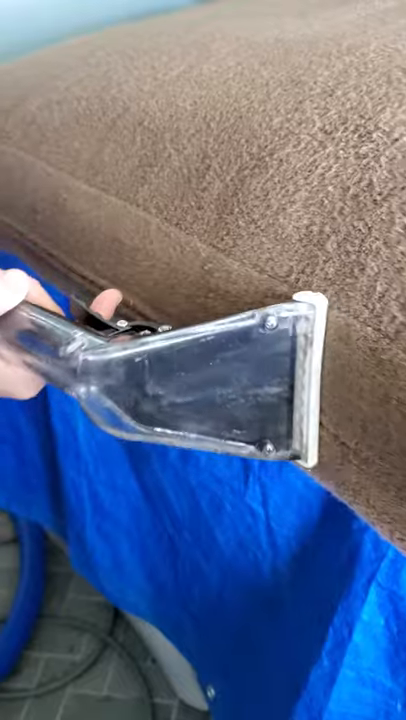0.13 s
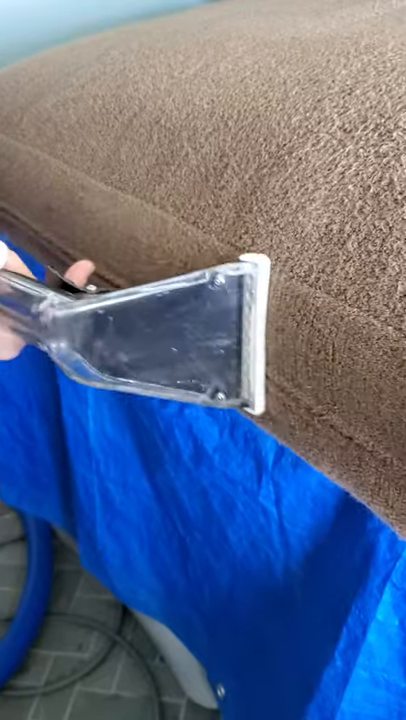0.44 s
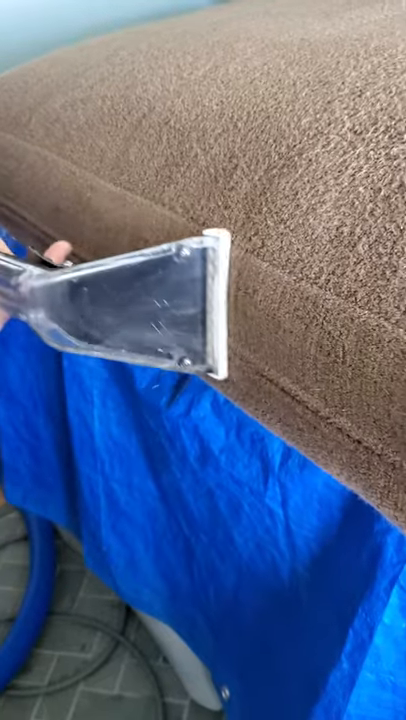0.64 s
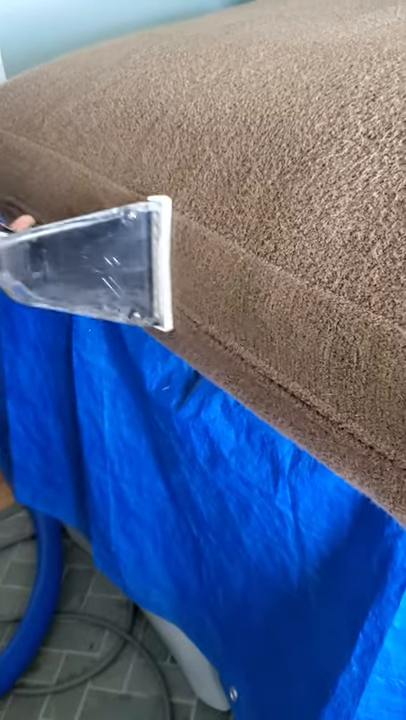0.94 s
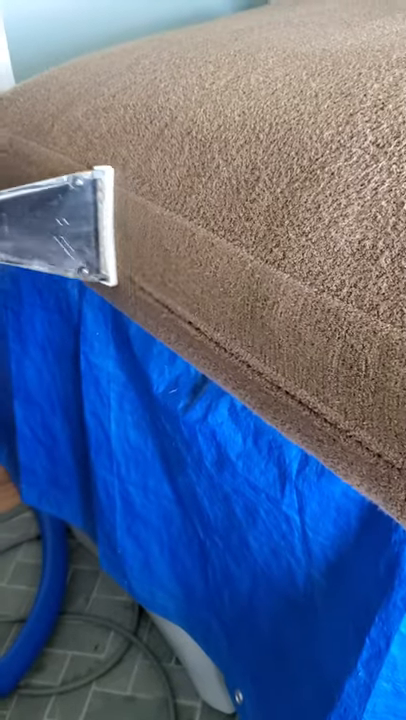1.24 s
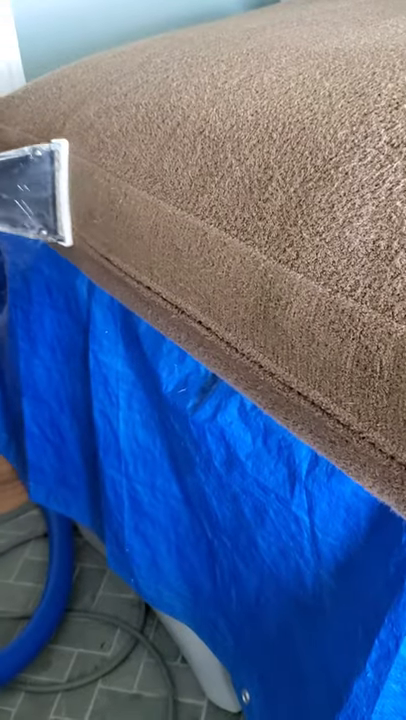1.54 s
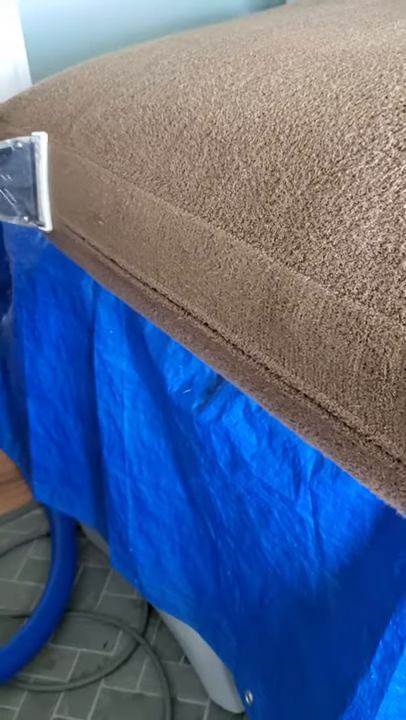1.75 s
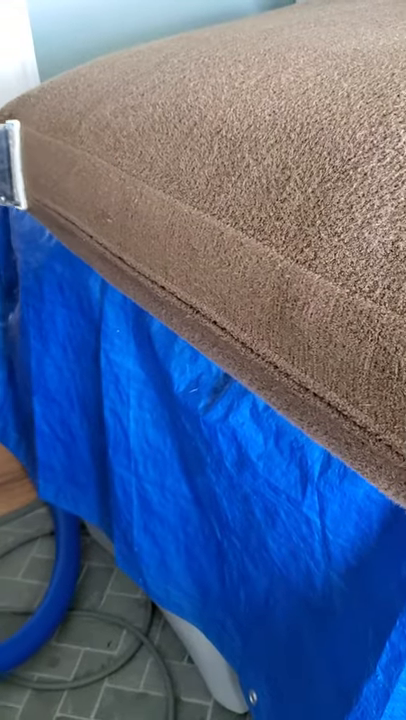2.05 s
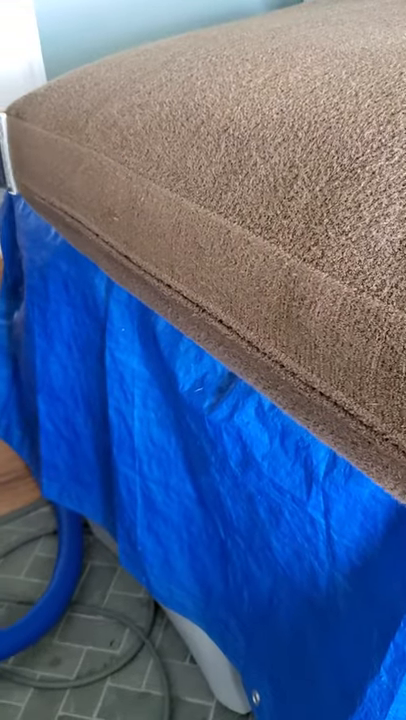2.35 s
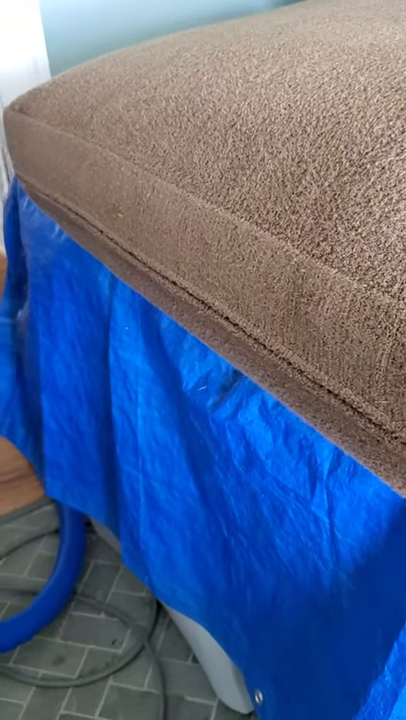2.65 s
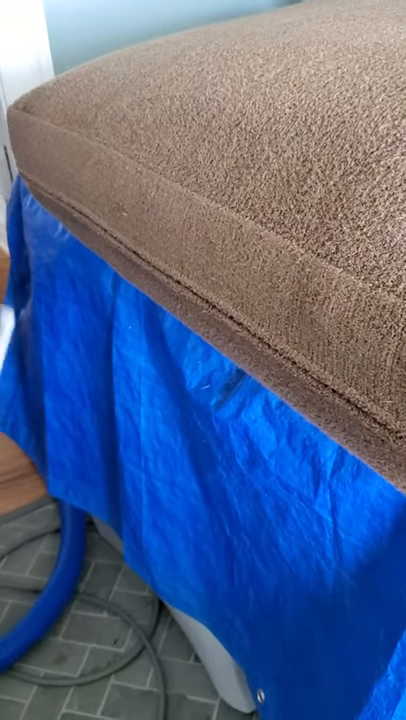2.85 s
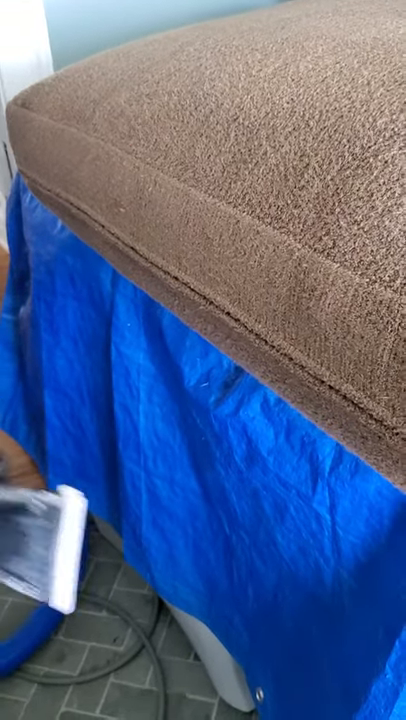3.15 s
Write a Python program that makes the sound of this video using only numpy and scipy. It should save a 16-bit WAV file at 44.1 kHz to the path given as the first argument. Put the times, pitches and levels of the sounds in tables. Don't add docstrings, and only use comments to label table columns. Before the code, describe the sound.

A loud upholstery extractor roars steadily indoors, its whine climbing while the nozzle is sealed on a cushion; then a falling whistle and tearing release give way to duller-pitched, hissing open air, close stereo microphone.

```python
import sys
import numpy as np
from scipy import signal
from scipy.fft import rfft, irfft, next_fast_len
from scipy.io import wavfile
from scipy.ndimage import uniform_filter1d, map_coordinates

SR = 44100
rng = np.random.default_rng(int(sys.argv[2]) if len(sys.argv) > 2 else 0)


def voltage_ratio(level):
    return 10 ** (np.asarray(level, float) / 20)


def pcm_store(signal):
    levels = np.round(np.clip(np.atleast_2d(signal), -1, 1) * 32767)
    wavfile.write(sys.argv[1], SR, levels.astype(np.int16).T)


N = 145971
TIME_S = np.arange(N) / SR
FASTER = 1.0087


def unit(x):
    return x / np.sqrt(np.mean(abs(x) ** 2) + 1e-20)


def along(points, hz):
    point_hz, value = np.transpose(points)
    return np.interp(np.log(hz + 1), np.log(point_hz + 1), value)


def curves(rows):
    row_s, *columns = np.transpose(rows)
    return [np.interp(TIME_S, row_s, column) for column in columns]


def ears(left_minus_right):
    return np.outer([0.5, -0.5], left_minus_right)


def wobble(knots_per_s):
    return map_coordinates(rng.standard_normal(600), [TIME_S * knots_per_s], mode="wrap")


def flutter(knots_per_s, depth):
    return 1 + depth * np.array([wobble(knots_per_s) + 1j * wobble(knots_per_s) for ear in "LR"])


def bump(f, hz, width_hz):
    return 1 / (1 + (2 * (f - hz) / width_hz) ** 2)


def bell(centre_s, length_s):
    return np.exp(-((TIME_S - centre_s) / length_s) ** 2)


def filtered(x, response):
    m = next_fast_len(N + 8192)
    return irfft(rfft(x, m) * response(np.fft.rfftfreq(m, 1 / SR)), m)[..., :N]


def opened():
    return np.clip((TIME_S - 2.5) * 10, 0, 1)


def rush(spectrum, peaks, lean, patchy_db):
    # frequency in Hz, left-right likeness (0..1)
    alike = [(60, 0.98), (260, 0.98), (350, 0.97), (500, 0.19), (860, 0.37), (1500, 0.33), (2000, 0.13),
             (2600, 0.037)]
    # frequency in Hz, left phase lead in rad
    lead = [(400, 0), (600, 1.4), (880, 0), (1050, .7), (1290, 3), (1650, 2), (2000, 3.1)]
    z = signal.stft(rng.standard_normal((2, N)), nperseg=512)[2]
    patches = uniform_filter1d(rng.standard_normal(z.shape[1:]), size=6, axis=0)
    patches = uniform_filter1d(patches, size=12, axis=1)
    pair = signal.istft(z * voltage_ratio(patchy_db * unit(patches)), nperseg=512)[1][:, :N]

    def likeness(f):
        angle = np.arccos(np.clip(along(alike, f), -1, 1)) / 2
        return np.array([np.cos(angle), np.sin(angle)])

    def colour(f):
        ring_db = sum(np.outer(db, bump(f, hz, width_hz)) for hz, width_hz, *db in peaks)
        level_db = along(spectrum, f) + ears(along(lean, f)) + ring_db
        return voltage_ratio(level_db) * np.exp(1j * ears(along(lead, f)))

    mid, side = filtered(pair, likeness)
    return unit(filtered(np.array([mid + side, mid - side]), colour))


def tone(turn, left_db, right_db, lead, shake):
    phase = turn + ears(lead + 0 * turn)
    level_db = np.array([left_db + 0 * turn, right_db + 0 * turn]) + 1.3 * wobble(22)
    return voltage_ratio(level_db) * np.sqrt(2) * np.imag(flutter(14, shake) * np.exp(1j * phase))


def fan_roar():
    # frequency in Hz, density in dB per Hz
    spectrum = [(25, -13), (70, -12.5), (330, -5), (1100, -3), (2000, -2.5), (3500, -7), (5600, -6),
                (6100, -12.5)]
    # frequency in Hz, width in Hz, left and
    # right in dB over the roar
    modes = [(60, 5, -6, 3), (117.7, 12.5, 11, 12), (180.5, 22.4, 12, 12.5), (249, 9.5, 9.5, 12),
             (319, 8.2, 0, 11), (366, 32, 4.5, 11), (463.6, 9.6, 14.5, -2), (508, 33, -9, 11),
             (642.4, 11.4, 13, 1.5), (701, 70, 6, 3), (761, 20, 9, 8), (865, 19, -1, 10.5),
             (1006, 28, -1.5, 8.5),
             (1107, 190, -4, -6), (1263, 43, -2, 8.5), (1456, 66, 9, 3.5), (1565, 23, 4.5, 10.5),
               (1660, 53, 3.5, 1.5), (1944, 14, -8, 6), (2340, 1000, 2.5, 1), (3920, 125, -4, 7.5),
               (4820, 390, 3.5, 0), (5500, 340, -7.5, 0.5),
             (295, 30, 9, 13), (1987, 14, 3, 9), (2049, 16, 4, 12)]
    # frequency in Hz, left over right in dB
    lean = [(100, -0.5), (300, 0.5), (740, -1), (2000, -5.5), (5500, -0.5), (15000, 1.5)]
    roar_db, rumble_hz, rumble_drop_db = -22, 150, -3
    gain = voltage_ratio(roar_db + 0.2 * wobble(2.625) + 0.64 * wobble(15))
    roar = gain * rush(spectrum, modes, lean, patchy_db=0.33)
    rumble = filtered(roar, lambda f: f < rumble_hz)
    return roar + (voltage_ratio(rumble_drop_db * opened()) - 1) * rumble


def fan_tones():
    # time in seconds, shaft speed in Hz
    shaft = [(.1, 481), (.44, 492.8), (.74, 500.5), (1.04, 506), (1.44, 509.8), (1.74, 511.5), (2.4, 512.5),
             (2.6, 508.5), (2.84, 496), (3.04, 488), (3.31, 477.5)]
    blades = [
        2,
        9,
        11,
        11 * FASTER,
    ]
    unsteady = [.14, .1, .2, .2]
    # time in seconds, left in dB, right in dB, left phase lead in rad
    hum_rows = [(0.15, -30.5, -32, 0), (0.24, -39, -33.5, 2), (0.36, -31.5, -32, 0),
                (0.55, -35, -27.5, -0.8), (0.72, -41, -32, -4), (0.86, -37, -41, -4.5),
                (1.03, -29, -31, -4.5), (1.25, -35, -34.5, -6.5), (1.42, -40, -35.5, -6.5),
                (1.65, -41, -59, -7), (2.1, -40, -41, -2.5), (2.45, -42, -47, -3), (2.65, -41, -33, -2),
                (2.82, -40, -36, -2), (2.89, -38, -27, -1.5), (3.05, -41, -30, 0.5), (3.25, -28, -34, 0)]
    first_rows = [(.15, -47, -47, 2.2), (.5, -46, -48, 2.2), (.65, -39, -37, -.8), (.78, -44, -44, -.5),
                  (.85, -35, -35, -.7), (.93, -31, -41, 1.4), (1.05, -35, -33, 3.1), (1.15, -38, -36, 6),
                  (1.33, -29, -38, 8.4), (1.42, -32, -35, 9.4), (1.51, -33, -31, 10.4),
                  (1.62, -35, -32, 10.8), (1.75, -30, -34, 11.4), (1.9, -38, -31, 14.2),
                  (2.05, -31, -32, 11.6), (2.16, -25, -38, 9.9), (2.3, -29, -30, 9.4),
                  (2.47, -32, -32, 9.4)]
    second_rows = [(.15, -42, -36, -1.2), (.25, -37, -41, 1), (.4, -43, -42, -1), (.55, -39, -40, -2),
                   (.65, -35, -39, -2), (.75, -42, -34, -3.6), (.95, -40, -38, -6.1),
                   (1.15, -50, -34, -4.5), (1.35, -38, -40, -1), (1.6, -37, -38, .2), (1.9, -50, -50, .2),
                   (2.35, -39, -43, .9)]
    twin_rows = [(.15, -41, -48, -.8), (.25, -41, -41, 1.9), (.35, -48, -50, 1), (.55, -52, -40, 1.2),
                 (.8, -45, -52, .6), (.95, -39, -39, 1.6), (1.05, -38, -45, 3.5), (1.15, -39, -41, 3.3),
                 (1.3, -43, -38, .6), (1.45, -43, -42, 1.3), (1.55, -43, -52, .3), (1.75, -51, -39, -.9),
                 (1.85, -52, -34, -2.2), (1.95, -52, -44, -.8), (2.05, -49, -42, -.7), (2.15, -54, -54, -2),
                 (2.27, -47, -46, -3), (2.4, -54, -52, -2)]
    faint_orders = [1, 18, 22, 9 * FASTER]
    # left in dB, right in dB
    faint_levels = [(-54, -47), (-50, -58), (-47, -49), (-50, -49)]
    choke_db, faint_shake = -10, 0.51

    speed_hz = uniform_filter1d(curves(shaft)[0], size=6000)
    turn = 2 * np.pi * np.cumsum(speed_hz) / SR
    tables = [hum_rows, first_rows, second_rows, twin_rows]
    strong = [tone(k * turn, *curves(rows), shake) for k, rows, shake in zip(blades, tables, unsteady)]
    hum, *whines = strong
    faint = sum(tone(k * turn, left_db, right_db, 0, faint_shake)
                for k, (left_db, right_db) in zip(faint_orders, faint_levels))
    return hum + voltage_ratio(choke_db * opened()) * (sum(whines) + faint)


def nozzle_hiss():
    # time in seconds, flow in dB, left over right in dB, sizzle in dB
    flow = [(.1, -24.5, 9, 0), (.38, -34, 8, 5), (.5, -33, 6, 0), (.7, -42, 8, -2), (1.1, -32, 9, -5),
            (1.55, -34, 11, -1), (1.69, -22.5, 6, -5), (1.8, -30, 4, -3), (2.05, -54, 5, 2),
            (2.35, -25, 9, -3), (2.42, -22, 3, -2), (2.46, -17.5, 5, 0.5), (2.52, -11.5, 0.5, 1.5),
            (2.58, -6, 6, 6), (2.7, -4, 7, 2.5), (2.85, -3, 5, 2.5), (3.0, -2, 3.5, 1),
            (3.31, -2, 3.5, 0.5)]
    # frequency in Hz, density in dB per Hz
    jet = [(600, -54), (2300, -21), (4200, -8.5), (6700, -8.5), (8500, -6), (11200, -4.5), (12200, -1),
           (15800, -1.5)]
    # frequency in Hz, width in Hz, left in dB, right in dB
    jet_peaks = [(3350, 400, 2, 3), (4180, 250, 4, 5), (4620, 250, -1, -4), (5180, 300, 2.5, 6),
                 (7700, 1100, 1.5, 3), (8800, 500, 2, -3), (9500, 500, 3, 2)]
    # frequency in Hz, left over right in dB
    jet_lean = [(2000, -18), (5000, -7.5), (7500, -6.5), (12000, -5.5)]
    edge_hz = 11600
    flow_db, lean_db, sizzle_db = curves(flow)
    gain = voltage_ratio(flow_db + ears(lean_db) + 0.51 * wobble(7.7) + 0.6 * wobble(35))
    hiss = gain * rush(jet, jet_peaks, jet_lean, patchy_db=0.3)
    sizzle = filtered(hiss, lambda f: 1 / (1 + (edge_hz / (f + 1)) ** 20))
    return hiss + (voltage_ratio(sizzle_db) - 1) * sizzle


def gap_whistle():
    # time in seconds, pitch in Hz, level in dB
    rows = [
        (2.21, 9850, -44),
        (2.27, 9740, -34),
        (2.31, 9370, -31),
        (2.355, 8930, -29),
        (2.41, 8710, -29),
        (2.46, 8600, -29),
        (2.5, 8680, -28),
        (2.52, 8800, -48),
    ]
    fade_s, lean_db, rough, spread_hz = 0.03, 7, 1.2, 260
    (first_s, first_hz, _), (last_s, last_hz, _) = rows[0], rows[-1]
    hz, db = curves([(first_s - fade_s, first_hz, -90), *rows, (last_s + fade_s, last_hz, -90)])
    carrier = np.exp(2j * np.pi * np.cumsum(hz) / SR)
    return voltage_ratio(db + ears([lean_db])) * np.imag(unit(flutter(spread_hz, rough)) * carrier)


def seal_tear():
    tear_db, tear_s, length_s, hz, width_hz = -28, 2.495, 0.046, 5040, 600
    ring = unit(filtered(rng.standard_normal((2, N)), lambda f: bump(f, hz, width_hz)))
    return voltage_ratio(tear_db) * bell(tear_s, length_s) * ring


def cushion_thud():
    thud_db, thud_s, length_s, hz = -39, 2.345, 0.035, 108
    return voltage_ratio(thud_db) * np.sqrt(2) * bell(thud_s, length_s) * np.sin(2 * np.pi * hz * TIME_S)


def tank_boom():
    # time in seconds, level in dB
    swells = [(.2, -31), (.35, -46), (.46, -33), (.6, -36), (.9, -38), (1.12, -32), (1.25, -34),
              (1.36, -43), (1.45, -34), (1.65, -33), (1.83, -43), (1.95, -31), (2.1, -36), (2.27, -34),
              (2.45, -36), (2.68, -30), (2.84, -22), (2.93, -35), (3.05, -31), (3.25, -42)]
    boom_hz, boom_db, lean_db, shake, wavers_per_s = 295, -2.5, 5, 0.45, 24
    note = unit(flutter(wavers_per_s, shake)[0]) * np.exp(2j * np.pi * boom_hz * TIME_S)
    return voltage_ratio(boom_db + curves(swells)[0] - ears([lean_db])) * np.sqrt(2) * note.imag


def pump():
    pump_hz, pump_db, shake = 29.9, -45, 0.25
    hum = flutter(23.85, shake)[0] * np.exp(2j * np.pi * pump_hz * TIME_S)
    return voltage_ratio(pump_db) * np.sqrt(2) * hum.imag


def scene():
    fan = fan_roar() + fan_tones()
    nozzle = nozzle_hiss() + gap_whistle() + seal_tear()
    return fan + nozzle + cushion_thud() + tank_boom() + pump()


def roll_off(x):
    return signal.sosfilt(signal.butter(12, 16100, fs=SR, output="sos"), x)


def record(dry):
    # time in seconds, gain in dB
    gain = [(.1, -0.5), (1.2, 0.5), (2.2, 0), (2.3, 1), (2.46, 0.5), (2.51, -1.5), (2.56, -12.5),
            (2.62, -15), (2.9, -15), (3.31, -15)]
    # frequency in Hz, width in Hz, level in dB
    dip_hz, dip_width_hz, dip_db = (10300, 5500, -4.1)
    peak_hz, peak_width_hz, peak_db = (15300, 3000, 3.5)
    top_hz, start_s = 15745, 0.1058

    def ports(f):
        dip = np.outer([0, dip_db], bump(f, dip_hz, dip_width_hz))
        return voltage_ratio(dip + peak_db * bump(f, peak_hz, peak_width_hz)) * (f < top_hz)

    heard = filtered(dry * voltage_ratio(curves(gain)[0]), ports) * (np.arange(N) >= start_s * SR)
    return roll_off(heard)


dry = scene()
out = record(dry)
pcm_store(out)
```